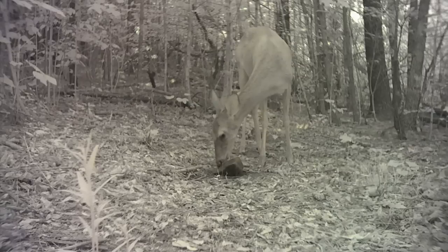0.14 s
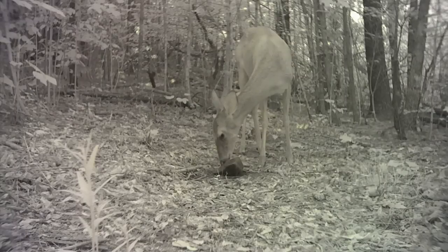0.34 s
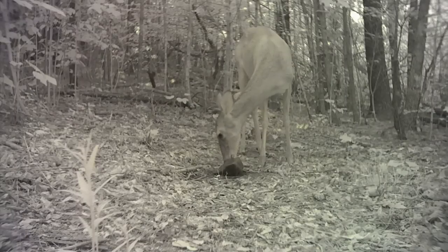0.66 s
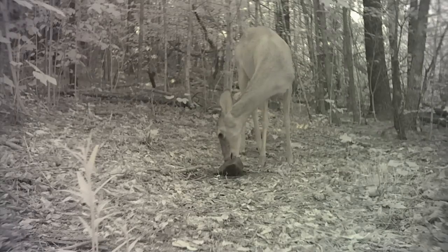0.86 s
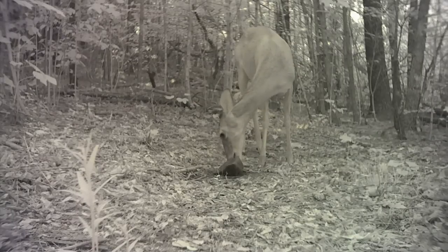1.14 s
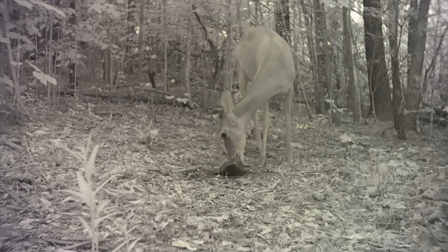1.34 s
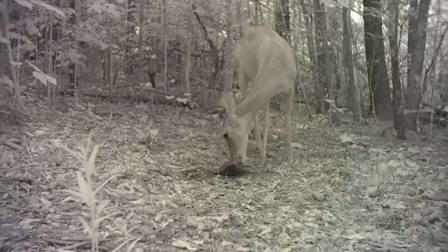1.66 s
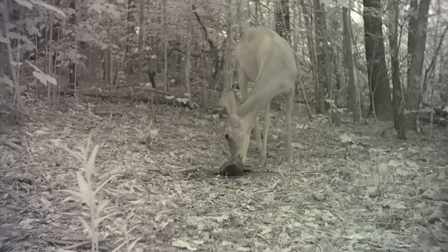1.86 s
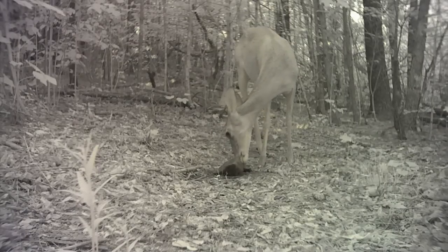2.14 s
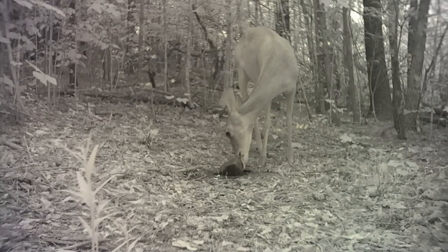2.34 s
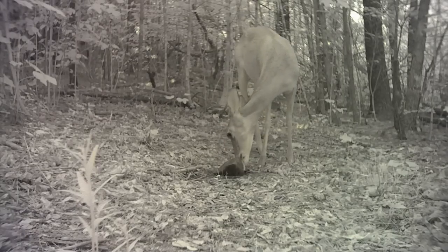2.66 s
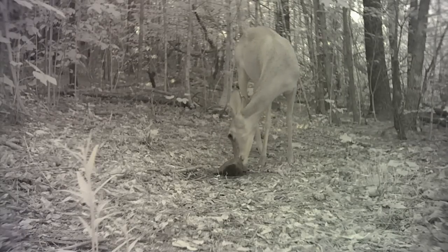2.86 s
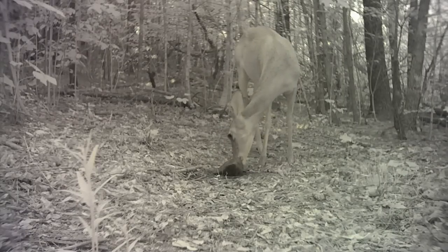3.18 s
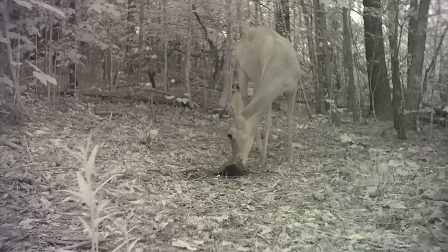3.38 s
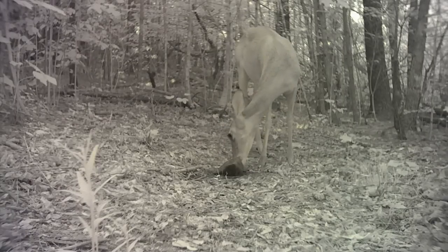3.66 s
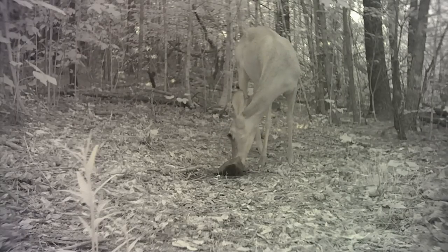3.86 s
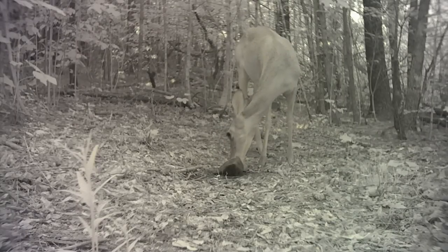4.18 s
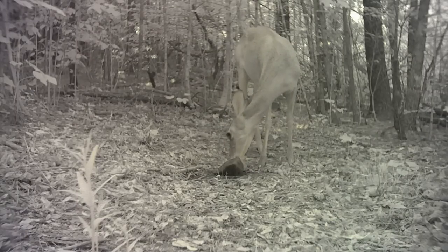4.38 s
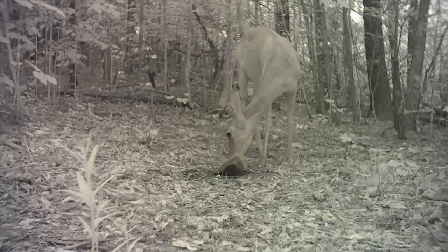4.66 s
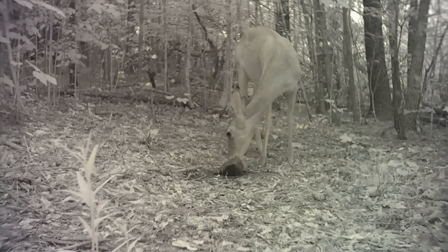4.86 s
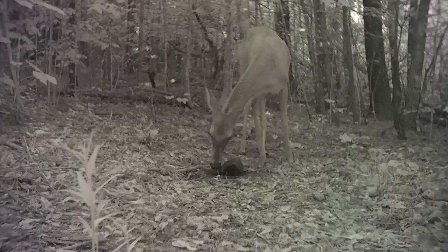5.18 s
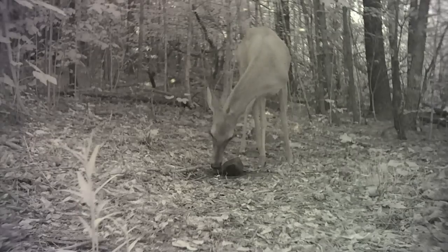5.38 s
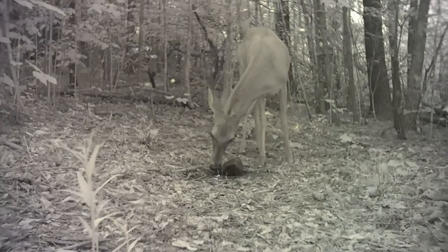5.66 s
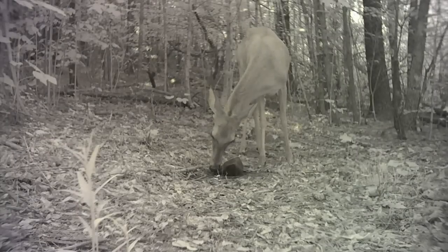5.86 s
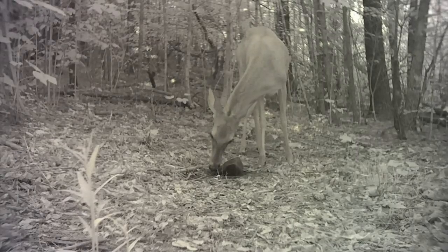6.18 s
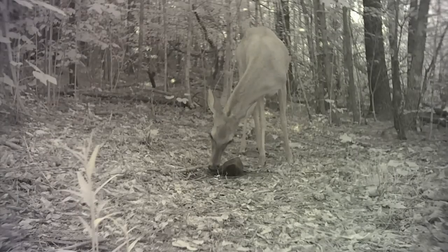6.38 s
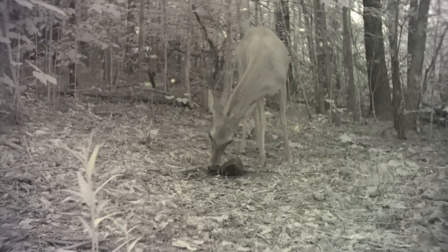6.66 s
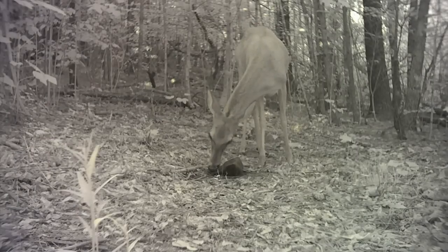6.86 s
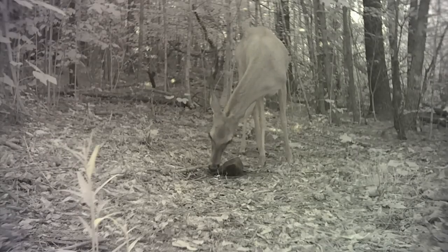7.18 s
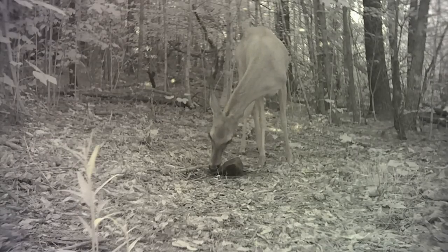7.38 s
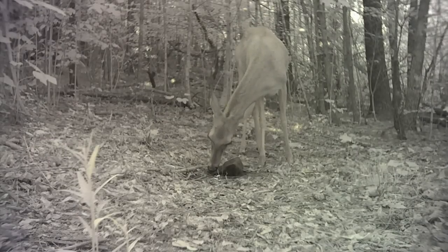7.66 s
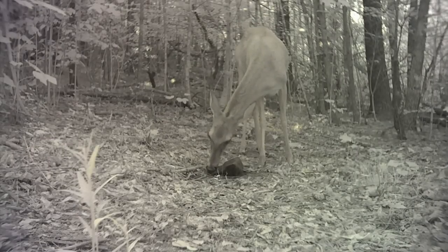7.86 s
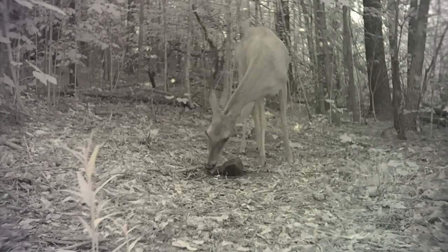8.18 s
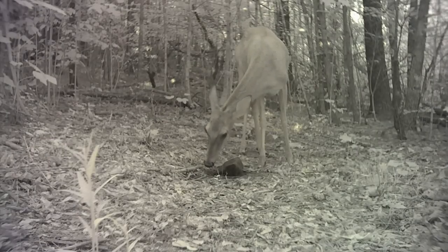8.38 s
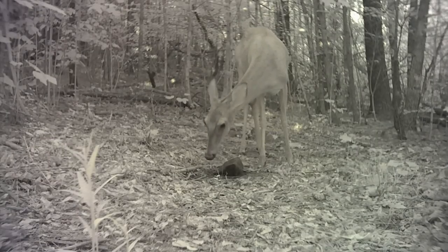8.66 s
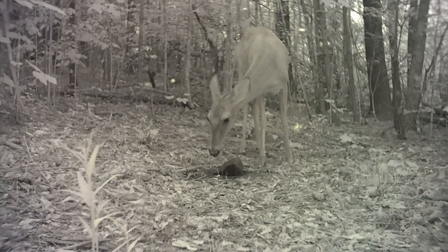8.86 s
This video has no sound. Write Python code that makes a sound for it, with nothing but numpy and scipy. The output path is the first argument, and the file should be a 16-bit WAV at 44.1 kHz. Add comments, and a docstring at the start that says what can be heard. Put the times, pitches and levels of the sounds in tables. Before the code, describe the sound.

A young bird repeats a raspy rising whistle in an echoing wood while a deer snaps and rustles dry leaves close by, over hiss and hum.

```python
"""A young bird repeats a rising, raspy whistle among the trees, with a few faint notes from farther off.
Close to a trail camera's microphone a deer feeds: dry snaps ring the port and leaves rustle as shaped noise.
Insects trill as pulsed tones over a steady hiss, and a limiter ducks whatever passes its threshold.
The camera hums, clicks, thumps once as it switches, fades, and drops out for a moment."""
import sys
import numpy as np
from scipy import signal
from scipy.fft import rfft, irfft, next_fast_len
from scipy.io import wavfile
from scipy.ndimage import uniform_filter1d

SR = 44100
rng = np.random.default_rng(int(sys.argv[2]) if len(sys.argv) > 2 else 0)


def wrap_up_sound(samples):
    """Save the sound to the file named by the first command line argument, as 16-bit audio."""
    columns = np.atleast_2d(samples).T
    # keep every value between -1 and 1, then stretch to whole-number steps
    tamed = np.clip(columns, -1, 1)
    steps = np.round(tamed * 32767).astype(np.int16)
    wavfile.write(sys.argv[1], SR, steps)


N = 397782

# the camera's switch, then the mute, the return of sound and the return of the hum [s]
SWITCH_S, MUTE_S, RESUME_S, HUM_BACK_S = 3.966, 4.917, 5.201, 5.38
CUTOFF_HZ = 15350  # top edge of the camera's sound


def from_db(db):
    """Decibels to gain."""
    return 10 ** (np.asarray(db) / 20)


def rms_one(x):
    """Scale to rms 1."""
    return x / np.sqrt(np.mean(x ** 2) + 1e-20)


def clock():
    """Time of each sample in seconds."""
    return np.arange(N) / SR


def drift(rate_hz):
    """Smooth chance of spread 1, slower than about rate_hz, drawn at every tenth sample."""
    count = next_fast_len(N // 10 + 2)
    hz = np.fft.rfftfreq(count, 10 / SR)
    smoothed = rfft(rng.standard_normal(count)) / (1 + (hz / rate_hz) ** 2)
    slow = rms_one(irfft(smoothed, count))
    return np.interp(np.arange(N) / 10, np.arange(count), slow)


def coloured_noise(spectrum, low_hz=10, high_hz=CUTOFF_HZ):
    """Noise with the given spectrum between two edges; rms 1."""
    hz = np.fft.rfftfreq(N, 1 / SR) + 1e-9
    points_hz, points_db = np.transpose(spectrum)
    gain = from_db(np.interp(np.log(hz), np.log(points_hz), points_db))
    gain = gain * (hz > low_hz) * (hz < high_hz)
    return rms_one(irfft(rfft(rng.standard_normal(N)) * gain, N))


def ring(clicks, hz, t60):
    """A two-pole resonator: a unit click sets a sine of starting height 1 ringing, down 60 dB after t60."""
    radius = from_db(-60 / (t60 * SR))
    angle = 2 * np.pi * hz / SR
    poles = [1, -2 * radius * np.cos(angle), radius * radius]
    return signal.lfilter([0, np.sin(angle)], poles, clicks + 1e-18)


def forest(x, near_db, near_t60, far_db, far_t60):
    """Direct sound, a quick scatter from nearby trunks and a longer one from deep in the wood."""
    t = np.arange(SR) / SR
    response = np.zeros(SR)
    response[0] = 1
    for level_db, t60 in ((near_db, near_t60), (far_db, far_t60)):
        scatter = rng.standard_normal(SR) * np.exp(-np.log(1000) * t / t60)
        response += from_db(level_db) * rms_one(scatter) / np.sqrt(SR)
    return signal.fftconvolve(x, response / np.linalg.norm(response))[:N]


# steady hiss, its dark lower part and its bright upper part:
# (frequency [Hz], relative level per Hz [dB])
HISS_LOW = [(30, -5), (55, -7), (100, -6), (200, -11.5), (400, -15), (720, -19), (1500, -23.5), (3500, -28)]
HISS_HIGH = [(3500, -0.5), (4300, 0), (4750, 3.5), (5050, 3.5), (5450, -1.5), (6200, -5), (7100, -6),
             (8200, -4), (8700, -8.5), (12000, -11.5), (15300, -14.5)]


def hiss(split_hz=3500, low_db=-37, high_db=-46):
    """Dark background noise with a bright hump where the microphone port resonates."""
    low = from_db(low_db) * coloured_noise(HISS_LOW, high_hz=split_hz)
    high = from_db(high_db) * coloured_noise(HISS_HIGH, low_hz=split_hz)
    return low + high


# hum lines inside the camera: (multiple of the frame rate [1], rms level [dB])
HUM = [(1, -36.5), (2, -52.5), (4, -55), (5, -62.5)]


def hum(frame_hz=29.5, whine_hz=12000, whine_db=-75, rumble_db=-44):
    """Electronics: frame-rate hum, low rumble, a faint whine that returns with the sound, before the hum."""
    t = clock()
    lines = np.zeros(N)
    for multiple, db in HUM:
        lines += from_db(db) * np.sin(2 * np.pi * (multiple * frame_hz * t + rng.random()))
    rumble = from_db(rumble_db) * drift(25)
    running = (t < MUTE_S) | (t > HUM_BACK_S)
    soft_switch = uniform_filter1d(running * 1., 400)
    whine = np.sqrt(2) * from_db(whine_db) * np.sin(2 * np.pi * whine_hz * t)
    return (np.sqrt(2) * lines + rumble) * soft_switch + whine


# one dry click inside the camera: (time [s], starting level of the ring [dB])
CLICK = (2.4254, -18)


def click(ring_hz=5100, ring_t60=.0055):
    """A very short, dry tick that rings the microphone port for a few milliseconds."""
    s, db = CLICK
    tick = from_db(db) * signal.unit_impulse(N, int(s * SR))
    return ring(tick, ring_hz, ring_t60)


def thump(level_db=0.0, rise_s=0.0033, fall_s=0.034, rebound_hz=3.0):
    """A switch steps the supply voltage; the coupling capacitor lets the step drain away."""
    age = np.maximum(clock() - SWITCH_S, 0)
    step = (1 - np.exp(-age / rise_s)) * np.exp(-age / fall_s)
    return -from_db(level_db) * step * np.cos(2 * np.pi * rebound_hz * age)


# insect trills: (start [s], end [s], mean pitch [Hz], mean amplitude [dB])
TRILLS = [(0, 2.5, 8500, -61.5), (3.3, 7.1, 8480, -59.5), (7.8, 9.1, 8450, -58), (0, 0.58, 8060, -60),
          (2.3, 2.9, 8130, -62), (3.25, 3.5, 8110, -57), (4.3, 7.3, 7740, -62.5)]


def insects(stroke_hz=26.4, depth=0.93, spread_hz=55, fade_s=.08):
    """Thin trills, each a wavering wing tone pulsed by the wing strokes."""
    t, out = clock(), np.zeros(N)
    for start, end, hz, db in TRILLS:
        singing = np.clip(np.minimum(t - start, end - t) / fade_s + .5, 0, 1)
        strokes = 1 + depth * np.sin(2 * np.pi * (stroke_hz * t + rng.random()))
        tone = np.sin(2 * np.pi * np.cumsum(hz + spread_hz * drift(120)) / SR)
        out += from_db(db) * singing * strokes * tone
    return out


# faint short notes from farther off, level before the forest's echo:
# (centre time [s], length [s], mean pitch [Hz], rms level at the centre [dB])
PEEPS = [(2.603, .05, 3780, -38), (7.88, 0.032, 3860, -46)]


def peeps(waver=.028):
    """Faint notes of a more distant bird: level tones with a slight waver, blurred by the trees."""
    t, out = clock(), np.zeros(N)
    wavering_clock = np.cumsum(1 + waver * drift(200)) / SR
    for s, length, hz, db in PEEPS:
        swell = np.exp(-(2 * (t - s) / length) ** 2)
        out += from_db(db) * swell * rms_one(np.sin(2 * np.pi * hz * wavering_clock))
    return forest(out, near_db=-3.0, near_t60=.12, far_db=-3.0, far_t60=.5)


# dry leaves as heard at the microphone: (frequency [Hz], relative level per Hz [dB])
LEAVES = [(1500, -24.5), (2800, -12), (3700, -5.5), (4300, -0.5), (5000, 2), (5600, -6), (6500, -21.5),
          (12000, -36)]
# stirred leaves: (centre time [s], length [s], level at the centre before the grain [dB])
RUSTLES = [(1.48, 0.041, -48), (1.923, 0.12, -47.5), (2.09, .04, -49), (2.24, .07, -48),
           (2.624, 0.1, -35.5), (4.002, 0.032, -38.5), (4.465, .05, -38.5), (4.536, 0.037, -42),
           (4.908, 0.011, -47), (7.113, .04, -45), (8.01, .035, -41)]


def rustles(grain_db=1.5):
    """Short grainy swells as the muzzle pushes through the leaves."""
    t, swell = clock(), np.zeros(N)
    for s, length, db in RUSTLES:
        swell += from_db(db) * np.exp(-(2 * (t - s) / length) ** 2)
    grain = from_db(grain_db * drift(250))
    return swell * grain * coloured_noise(LEAVES)


# crisp snaps of the deer's feeding, close by: (time [s], strength before the trims in snaps() [dB])
SNAPS = [(1.4735, -35), (1.489, -26), (1.8844, -27), (3.169, -31), (3.9928, -20), (4.8998, -26)]


def snaps(level_db=-2.0, ring_hz=5000, ring_t60=0.017, crack_db=-7.0, crack_s=0.0014):
    """Each bite is a tiny crack of dry matter that rings the microphone port."""
    t, clicks, cracks = clock(), np.zeros(N), np.zeros(N)
    for s, db in SNAPS:
        clicks[int(s * SR)] = from_db(db)
        cracks += from_db(db + crack_db) * np.exp(-np.abs(t - s) / crack_s) * (t >= s)
    ringing = from_db(level_db) * ring(clicks, ring_hz, ring_t60)
    dry_snaps = ringing + cracks * coloured_noise(LEAVES)
    return forest(dry_snaps, near_db=-4.5, near_t60=.08, far_db=-18.5, far_t60=.4)


LEAD_S, LEAD_HZ_PER_S = .085, 4000  # length and rise of the soft low note before the slide
SWELL_DB, SWELL_SHARE = 16, 0.5  # rise in level, and the share of the slide that it takes
FADE_DB, FADE_CURVE = 17, 1.33  # fall in level to the end; a curve above 1 holds before it drops


def whistle_shape(age, slide_s, length_s, lead_hz, low_hz, top_hz):
    """A soft low note breaks into a swelling slide, then fades at its top: pitch [Hz], gain, fade (0-1)."""
    slide = np.clip(age / slide_s, 0, 1)
    fade = np.clip((age - slide_s) / max(length_s - slide_s, 1 / SR), 0, 1)
    lead_pitch = lead_hz + LEAD_HZ_PER_S * age  # the lead-in comes before age 0
    slide_pitch = low_hz + (top_hz - low_hz) * np.sin(np.pi / 2 * slide)
    hz = np.where(age < 0, lead_pitch, slide_pitch)
    db = -SWELL_DB * np.maximum(1 - slide / SWELL_SHARE, 0) ** 2 - FADE_DB * fade ** FADE_CURVE
    onset = np.minimum(1 + age / LEAD_S, 1) ** 2
    return hz, from_db(db) * onset, fade


# the bird's calls among the trees, pitches before the waver, level before shimmer and echo:
# (slide start [s], slide length [s], length from slide start [s], pitch at end of lead-in [Hz],
#  low pitch [Hz], top pitch [Hz], level at full swell [dB], mean buzz rate [Hz], rasp before the fade [0-1])
WHISTLES = [ (0.818, 0.11, 0.23, 3000, 3300, 4340, -17.5, 369, 0.49),
            (2.63, 0.14, 0.24, 3160, 3070, 4640, -24.5, 312, 0.56),
            (4.082, 0.15, 0.23, 3000, 3263, 4520, -21, 508, 0.6),
            (5.88, .162, 0.288, 2752, 2870, 4540, -20.3, 363, 0.26),
            (7.998, 0.13, 0.24, 2710, 3267, 4344, -19, 350, .22), ]


def bird(swing=0.96, throb=0.67, jitter=0.014, slide_jitter=.023, settled_hz=4400, jitter_hz=220,
         buzz_jitter=.05, shimmer_db=1.6, wander=0.00704, beak_hz=5250, rasp_growth=1.4):
    """A whistle slides up and levels off; a fast buzz shakes its pitch and strength and adds side tones."""
    t, out = clock(), np.zeros(N)
    buzz_clock = np.cumsum(1 + buzz_jitter * drift(40)) / SR
    shake = drift(jitter_hz)
    shimmer = shimmer_db * drift(48)
    waver = wander * drift(13.6)
    for start, slide_s, length_s, lead_hz, low_hz, top_hz, level_db, buzz_hz, call_rasp in WHISTLES:
        on = (t > start - LEAD_S) & (t < start + length_s)
        hz, gain, fade = whistle_shape(t[on] - start, slide_s, length_s, lead_hz, low_hz, top_hz)
        # the rasp grows as the call fades
        rasp = np.clip(call_rasp * (1 + rasp_growth * fade), 0, 1)
        # the voice is hoarse low in the slide and clears as it reaches its top
        hoarseness = jitter + slide_jitter * np.clip(4 * np.log2(settled_hz / hz), 0, 3)
        buzz = np.cos(2 * np.pi * buzz_hz * buzz_clock[on])
        # pitch and strength rise together, so the upper side tone is the stronger one
        shaken_hz = hz * (1 + waver[on] + hoarseness * shake[on]) + swing * rasp * buzz_hz * buzz
        phase = 2 * np.pi * np.cumsum(shaken_hz) / SR
        tone = rms_one(np.sin(phase) * (1 + throb * rasp * buzz))
        level = gain * from_db(level_db + shimmer[on])
        out[on] += tone * level * signal.windows.tukey(on.sum(), .04)
    # throat and beak let little through above the whistle's top
    beak = signal.butter(10, min(beak_hz, .45 * SR), fs=SR, output="sos")
    return forest(signal.sosfilt(beak, out), near_db=3.5, near_t60=0.18, far_db=0.5, far_t60=0.46)


def scene():
    """One microphone feeds both channels."""
    air = hiss() + click() + insects() + peeps() + rustles() + snaps() + bird()
    return np.array([air, air])


def limiter(x, threshold_db=-23.5, release_db_per_s=150):
    """The gain falls as soon as the level passes the threshold and recovers quickly."""
    level_db = 10 * np.log10(np.abs(uniform_filter1d(x ** 2, size=500)) + 1e-12)
    ramp = release_db_per_s * clock()
    # a running maximum against the ramp holds each peak and releases it at a steady rate
    over_db = np.maximum.accumulate(np.maximum(level_db - threshold_db, 0) + ramp) - ramp
    return x * from_db(-uniform_filter1d(over_db, size=200))


# the microphone's sensitivity sags after the switch: (time [s], level [dB])
SAG = [(4.05, 0), (4.42, -2.5), (4.6, -6.5), (4.8, -14.5), (4.92, -13), (5.1, 0.04)]
# faint low-heavy noise, drawn separately for left and right: (frequency [Hz], relative level per Hz [dB])
SIDE_NOISE = [(30, 46), (120, 24), (500, 6), (2000, 5), (4500, 2), (8000, 5.5), (15000, 6)]


def record(dry, side_noise_db=-61):
    """Sagging sensitivity, hum, limiter, thump, faint noise left and right, a short mute and a steep top cut."""
    t = clock()
    sensitivity = from_db(np.interp(t, *np.transpose(SAG)))
    microphone = dry.mean(axis=0) * sensitivity
    limited = limiter(microphone + hum()) + thump()
    side_noise = np.array([coloured_noise(SIDE_NOISE) for side in dry])
    out = limited + from_db(side_noise_db) * side_noise
    out = out * ((t < MUTE_S) | (t > RESUME_S))
    top_cut = signal.firwin(255, CUTOFF_HZ, fs=SR)
    return signal.fftconvolve(out, top_cut[None], "same", axes=1)


dry = scene()
out = record(dry)
wrap_up_sound(out)
```